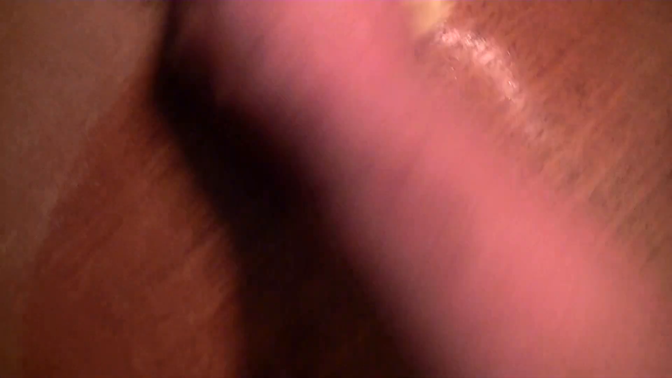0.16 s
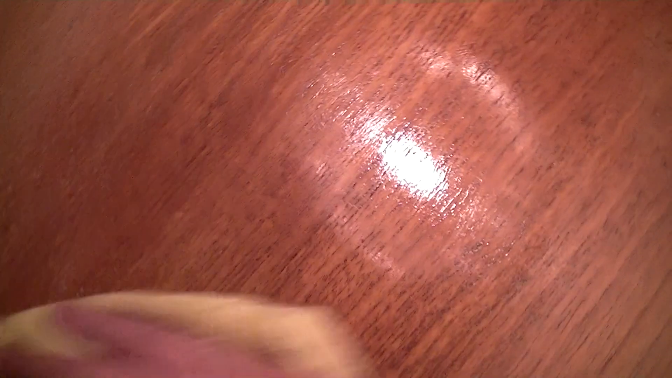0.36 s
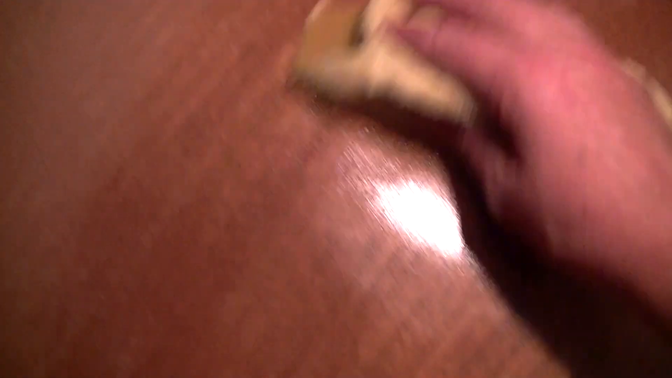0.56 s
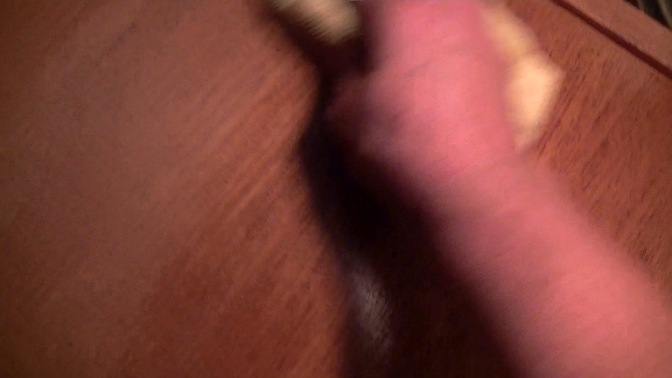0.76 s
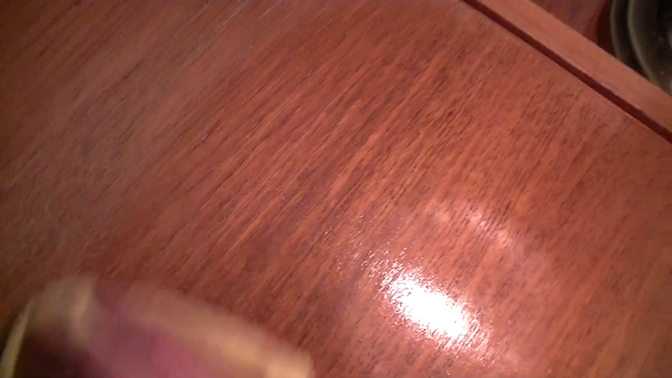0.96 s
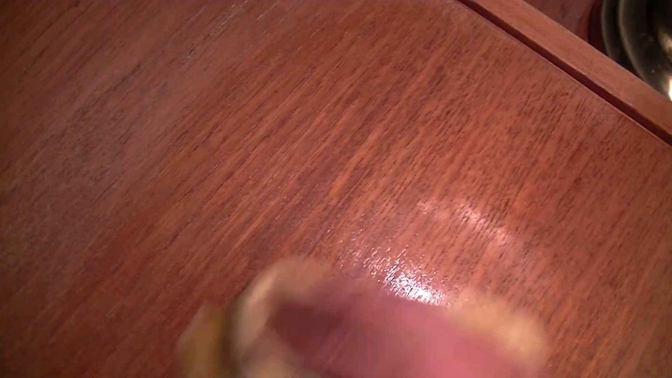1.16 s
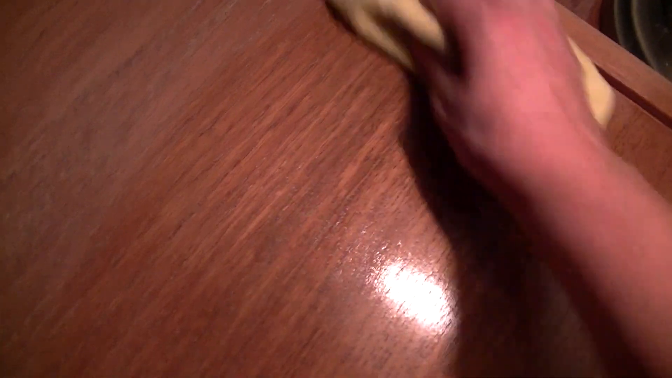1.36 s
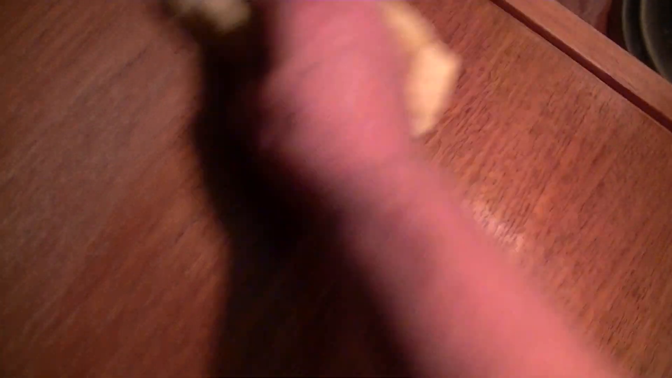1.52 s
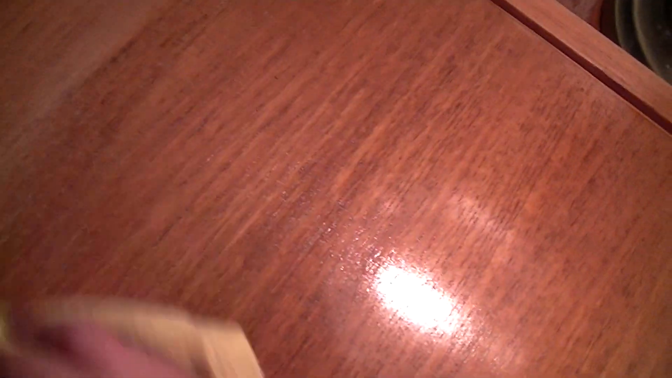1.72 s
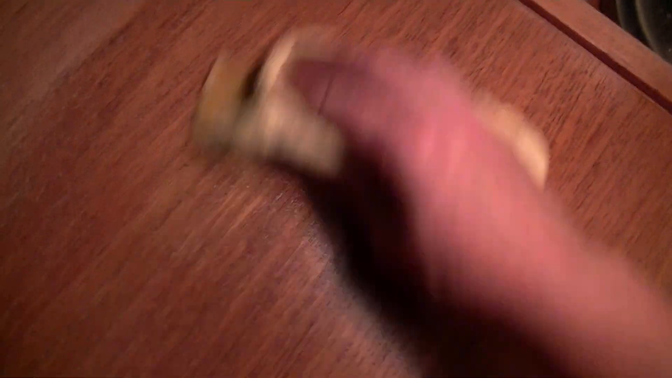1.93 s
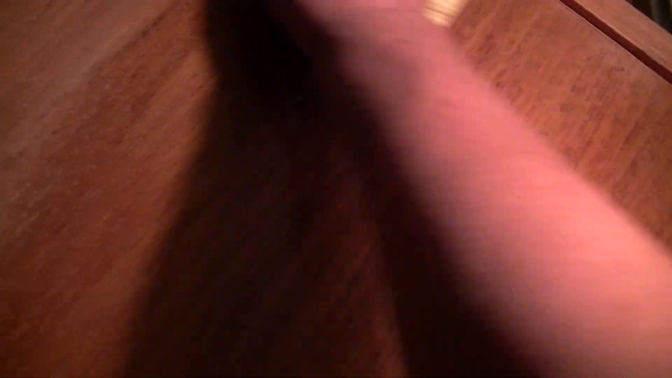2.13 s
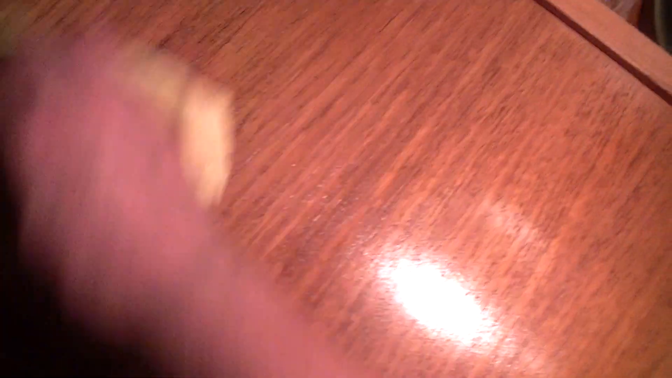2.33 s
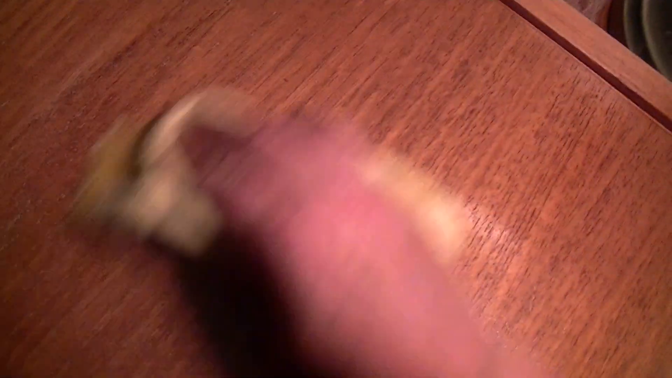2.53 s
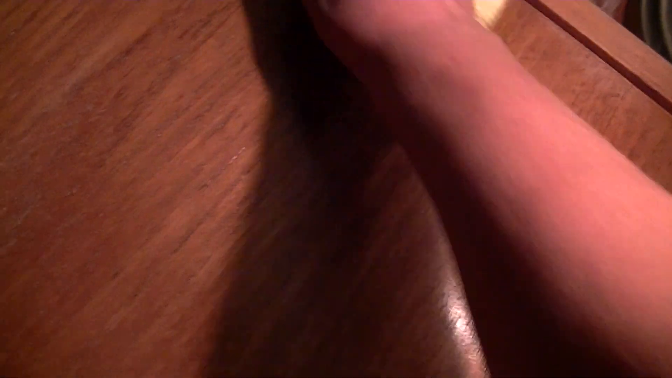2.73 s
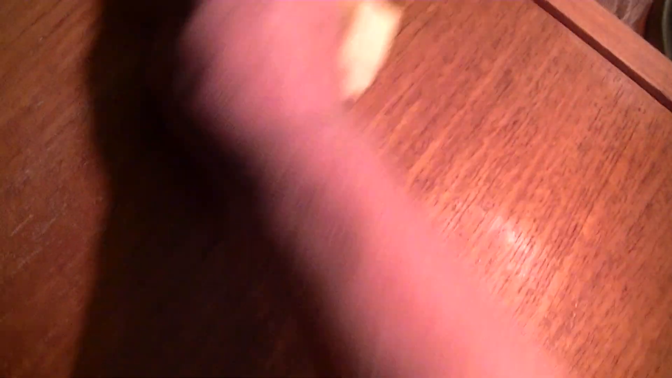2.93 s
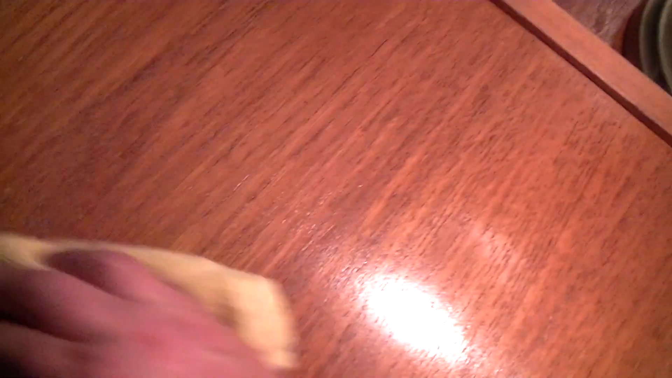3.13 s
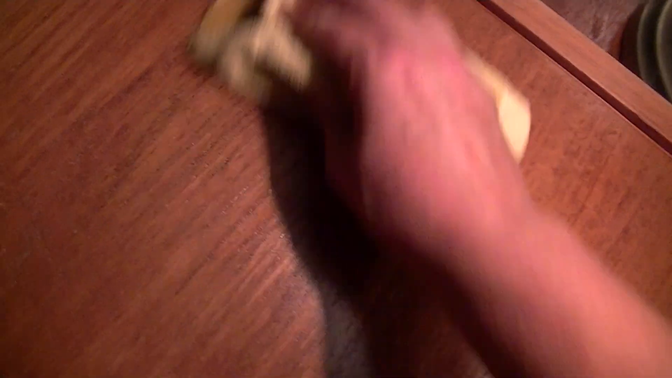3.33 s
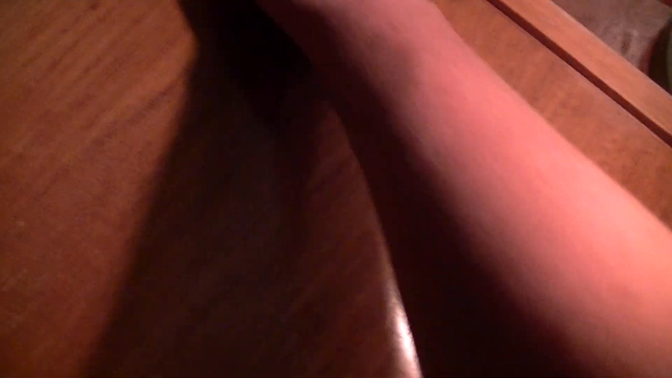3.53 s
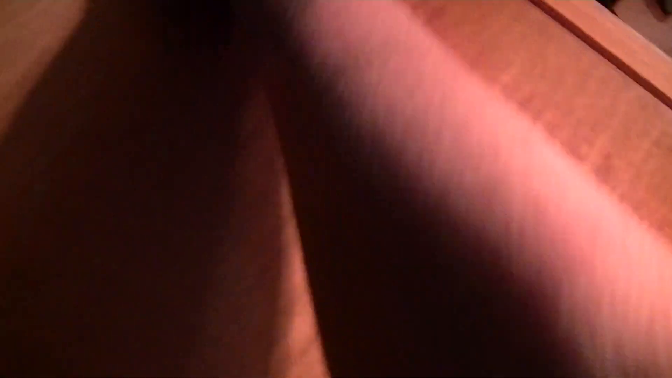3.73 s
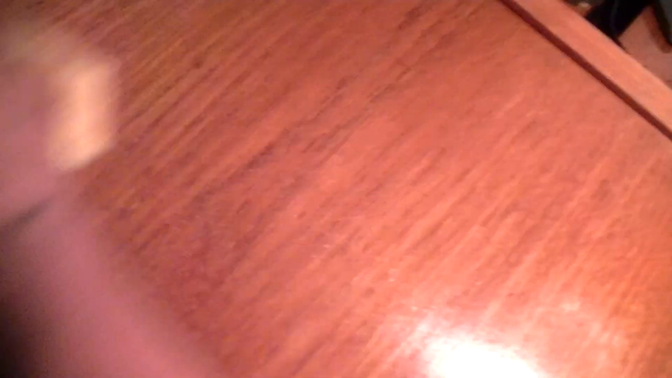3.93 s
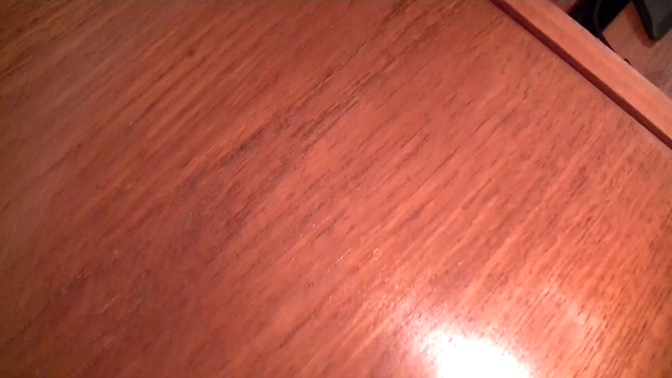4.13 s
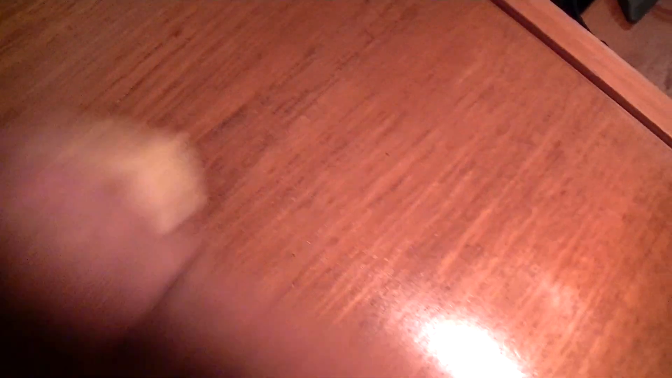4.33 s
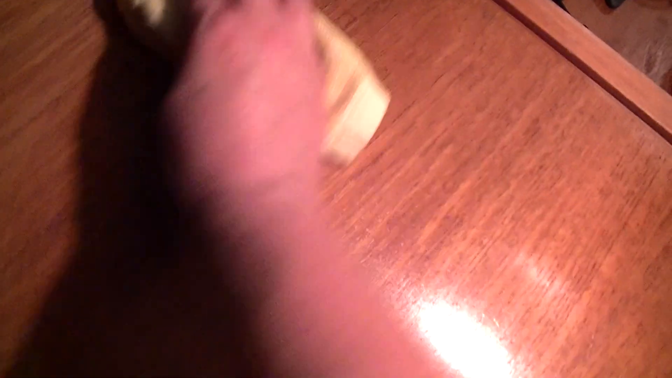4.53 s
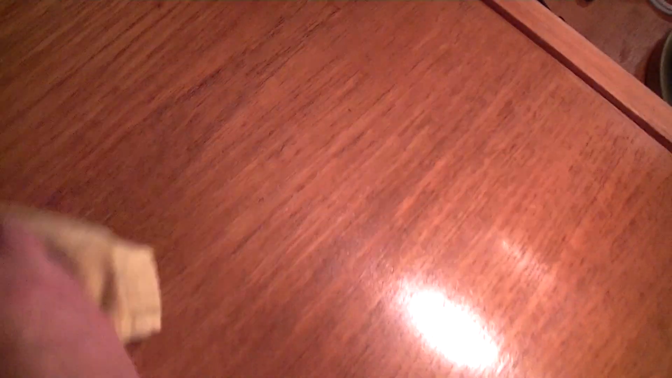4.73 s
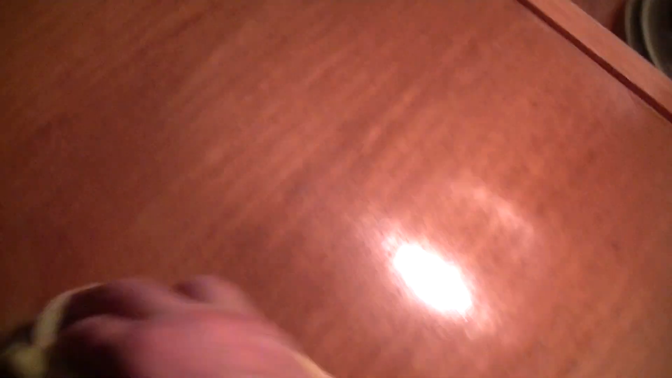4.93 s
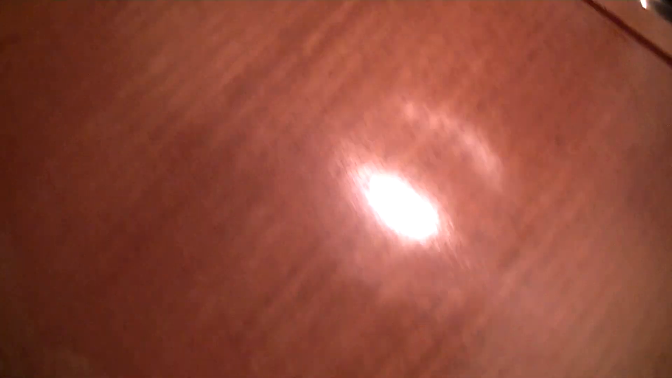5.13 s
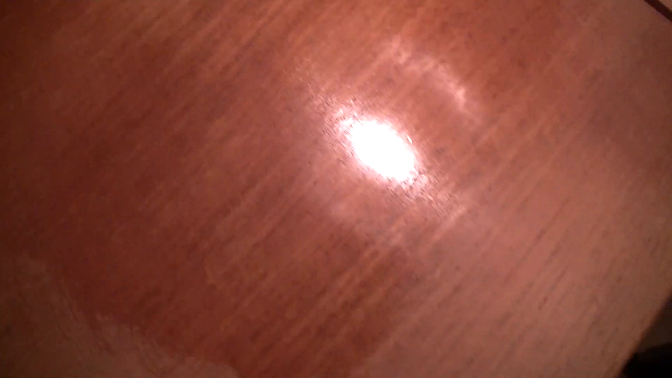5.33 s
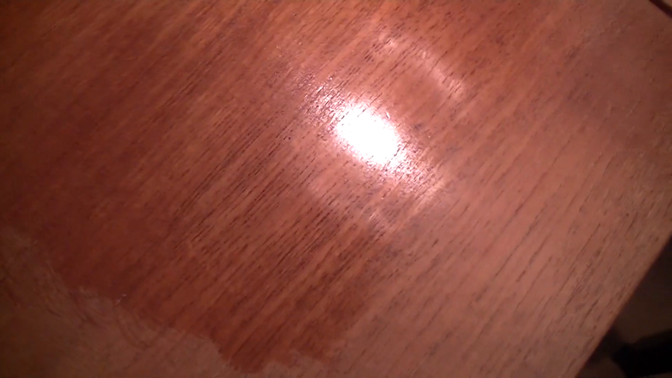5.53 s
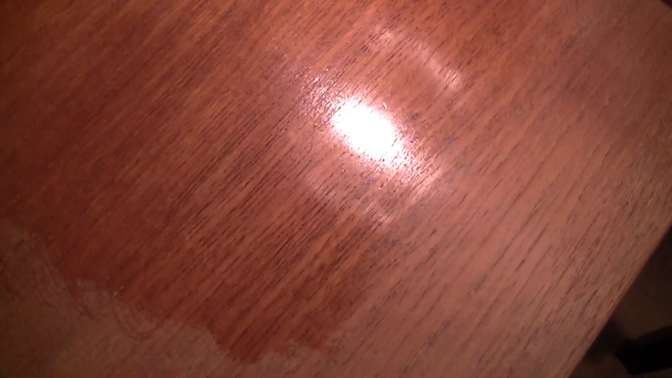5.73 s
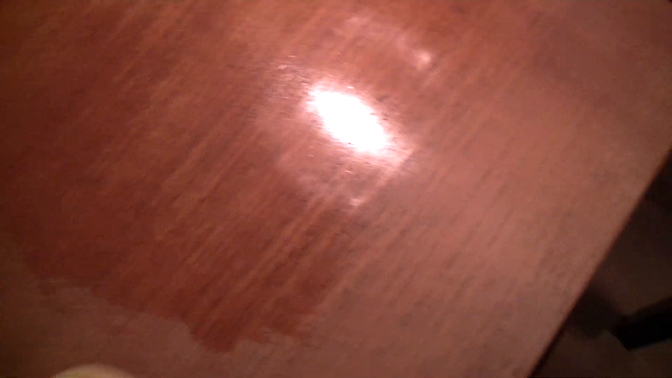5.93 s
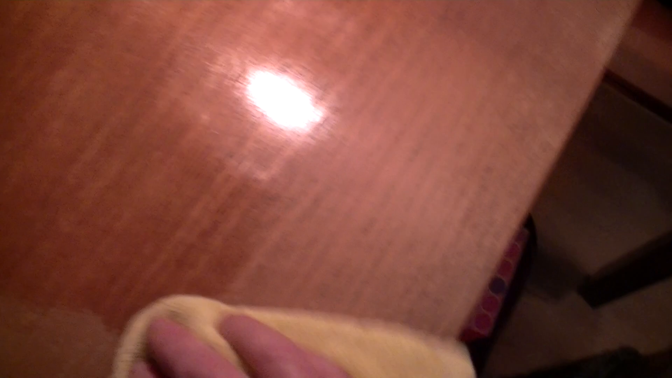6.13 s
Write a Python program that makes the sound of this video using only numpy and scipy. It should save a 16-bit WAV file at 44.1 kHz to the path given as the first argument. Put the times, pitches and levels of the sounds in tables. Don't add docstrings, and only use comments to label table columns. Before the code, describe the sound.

Close stereo rubbing of cloth on wood indoors: continuous swishing strokes, bright fibre hiss over a hollow mid-pitched scrape, shifting slightly left once each circle. Small taps come now and then, with one sharp clattering knock past the middle. After nearly five seconds the hand leaves; low room hush, appliance hum and faint lens ticking remain, then the cloth crackles down and rubs again.

```python
import sys
import numpy as np
from scipy import signal
from scipy.fft import rfft, irfft, next_fast_len
from scipy.io import wavfile

SR = 44100
rng = np.random.default_rng(int(sys.argv[2]) if len(sys.argv) > 2 else 0)


def to_wav(s):
    ch = np.atleast_2d(s).T
    pcm = np.round(np.clip(ch, -1, 1) * 32767)
    wavfile.write(sys.argv[1], SR, pcm.astype(np.int16))


def undo_db(level):
    steps = np.asarray(level, float) / 20
    return 10 ** steps


N = 276286

# pitch_hz, level_db (per Hz)
AIR_COLOUR = [(20, -21), (110, -26), (190, -18), (260, -9.5), (400, -1), (550, 3), (900, 2.5), (1050, 2.5),
              (1500, -1), (2500, -5), (3600, -8.5), (4950, -8), (5200, -15), (15600, -33)]
# pitch_hz, likeness (0-1)
AIR_LIKENESS = [(100, 0.18), (150, 0.69), (500, 0.86), (2000, 0.67), (5000, 0.74), (12000, 0.85)]
# pitch_hz, level_db (rms), waver_hz
HUM_TONES = [(123, -102, 2), (300, -87, 2), (533, -74.5, 3), (790, -80, 12), (1030, -79, 20),
             (3274, -76.5, .4)]
# time_s, rise_db, half_width_s
LOW_SURGES = [(0.0, 8.4, 0.35), (1.75, 15, 0.49), (2.4, 8.3, 0.32), (3.0, 5.4, 0.48), (3.9, 4.8, 1),
              (4.6, 6.8, 0.36), (6.26, 4.1, 0.1)]
# time_s, rise_db, half_width_s
HIGH_SURGES = [(.25, 5.2, 0.37), (1.55, 7.7, .3), (2.43, 11, 0.27), (3.7, 11, 0.53), (5.35, 10.4, 0.32),
               (6.26, 6, 0.36)]
# start_s, peak_db
LENS_STEPS = [(5.2031, -61), (5.2355, -59), (5.2694, -64), (5.3023, -58), (5.3353, -61), (5.4365, -58),
              (5.469, -58), (5.5024, -61), (5.5358, -61), (5.5697, -59), (5.6032, -60), (5.6361, -60),
              (5.67, -62), (5.7019, -58), (5.7359, -62), (5.8905, -63), (5.9464, -62), (5.9798, -59),
              (6.0122, -58)]
# start_s, peak_db, centre_hz, length_s
LANDING_CRACKLES = [(5.792, -62, 9500, .003), (6.114, -58, 12500, .012), (6.165, -48, 8000, .006),
                    (6.182, -46, 5500, .0015), (6.188, -41, 4830, 0.0014)]
# start_s, peak_db, pitch_hz,
# ring_s
WOOD_TICKS = [(3.517, -37, 880, .025), (3.522, -41, 415, .035), (3.5235, -35, 1130, .035),
              (3.521, -39.5, 650, .04), (3.536, -39, 600, .045), (3.546, -52, 270, .045),
              (3.553, -39, 1950, .03), (3.555, -38.5, 2600, .02), (3.564, -47, 900, .015),
              (3.609, -39, 1720, .035), (3.610, -41, 1960, .03), (4.139, -35.5, 2050, .025),
              (4.144, -40, 1550, .014), (4.146, -41, 2400, .012), (4.16, -41, 1950, .02),
              (4.151, -37, 3100, .005), (4.172, -41, 2600, .015), (4.952, -52, 2300, .06),
              (5.677, -64, 4250, .05), (5.812, -59, 2850, .04), (5.527, -66, 11500, .002),
              (5.791, -60, 8300, .002), (6.035, -62, 9000, .002)]
# start_s, peak_db, pitch_hz, ring_s
SOFT_BUMPS = [(0.178, -50.5, 405, 0.033), (1.314, -62, 260, 0.11), (1.485, -69.5, 131, 0.19),
              (1.511, -51.5, 381, 0.17), (2.143, -36, 2050, 0.02), (2.149, -39, 1780, .02),
              (2.361, -61, 257, 0.14), (2.37, -79, 122, 0.24), (2.411, -55, 264, 0.16),
              (2.392, -38, 1420, 0.046), (2.741, -35.5, 1420, 0.029), (2.743, -38, 3140, 0.017),
              (2.747, -40, 754, 0.023), (2.765, -46, 780, 0.025), (2.745, -40, 2450, .015),
              (2.747, -33, 4120, .01), (3.52, -50, 2060, .04), (3.95, -54, 290, 0.12),
              (4.951, -46, 1360, 0.064), (5.89, -50, 600, 0.088), (3.95, -40.5, 778, 0.068),
              (4.05, -44, 750, 0.055), (6.027, -51, 1057, .04), (6.034, -53.5, 420, 0.04)]
# start_s, peak_db, dullness_db (per octave)
KNOCK_BOUNCES = [
    (3.518, -43, -7),
    (3.5229, -43, -4),
    (3.5275, -32.5, 2),
    (3.537, -41, 6.5),
    (3.543, -33, -2),
    (3.55, -42, 2),
    (3.565, -41, 5),
]
# pitch_hz, level_db, ring_s (time to fall 60 dB)
TABLETOP_MODES = [(168, -26, 0.08), (260, -1, 0.033), (353, -7, 0.04), (450, -2, 0.017), (520, 6, 0.029),
                  (648, 10, 0.039), (910, 1, 0.03), (1010, -4, 0.021), (1350, 6, 0.033), (1850, -6, .04),
                  (2010, 0, 0.05), (2600, -6, 0.023)]
# time_s, pressure_db, speed_db
HAND = [(0.0, 0.5, -2), (0.75, -1.5, 0.5), (1.5, 1, 1.5), (3.0, -0.5, 1), (3.9, 4.5, -1), (4.81, -0.5, 2),
        (4.86, -10, -2), (4.9, -2.5, -14.5), (5.0, -6, -14), (5.06, -14.5, -12.5), (5.18, -27, -14),
        (5.72, -29.5, -13), (5.9, -14, -19.5), (5.97, -17, -20), (6.05, -2.5, -23.5), (6.15, -19, -12),
        (6.185, -14.5, -3.5), (6.265, -8, -5)]
# time_s, extra_pressure_db
PRESSES = [(.09, 1), (.2, 2), (.28, 4.5), (.585, -0.5), (.975, 2.5), (1.33, 0.5), (1.69, 4.5), (1.945, 0.5),
           (2.1, 2), (2.17, 2.5), (2.39, 5), (2.63, 1.5), (2.751, 2.5), (2.865, 2), (3.02, 4.5), (3.085, 5),
           (3.35, 1.5), (3.47, 1.5), (3.55, 0.5), (4.05, 2.5), (4.15, 1.5), (4.315, -0.5), (4.61, 4.5),
           (4.69, 1), (4.96, 2)]
# time_s, extra_speed_db, half_width_s
SWEEPS = [(.1, 2, 0.044), (.63, 0, 0.082), (1.33, -1.5, 0.1), (1.52, 0.5, .05), (1.99, 1.5, 0.045),
          (2.2, 5, 0.051), (2.645, 3, 0.079), (2.899, 4, 0.058), (3.38, 2.5, 0.06), (4.09, 2, 0.19),
          (4.31, 3, .04), (4.43, 5, .05)]
# time_s, sag_db, half_width_s
TURNS = [(.04, 0.5, 0.022), (.39, 4.5, 0.044), (.505, 1, .04), (.87, 2, 0.031), (1.1, 5, 0.068),
         (1.61, 1.5, 0.036), (1.81, 3, 0.06), (2.08, 2, .03), (2.28, 1, 0.029), (2.46, 2.5, 0.032),
         (2.81, 0.5, .035), (2.96, 0.5, .03), (3.16, 0.5, 0.031), (3.68, 1, 0.046), (4.235, 5.5, 0.053),
         (4.54, 2, 0.12), (4.72, 1, 0.026)]
# time_s, how_far (0-1), half_width_s
ASIDE = [(.33, 0.8, 0.09), (1.0, 0.75, 0.19), (1.74, 1, 0.1), (2.42, 0.9, 0.14), (3.12, 0.6, 0.19),
         (4.05, 1.1, 0.14), (4.28, 0.8, 0.19), (4.78, 0.8, 0.16), (6.22, 0.6, .1)]
ZONE_EDGES = [450, 1400, 4000, 10000, 15000]
ZONE_LEVELS = [-54, -48.5, -49.5, -64]
FOLLOWS_PRESSURE = [0.97, 0.63, 0.44, 0.22]
FOLLOWS_SPEED = [0.05, 0.3, 0.6, 1.15]
FOLLOWS_ASIDE = [-0.52, 0.88, 0.66, 0.025]
# time_s, lift_db, half_width_s, pitch_hz
HAND_POCKETS = [(2.27, -9, 0.045, 1900), (.2, 9, 0.028, 704), (.27, 3.5, 0.059, 2700),
                (.48, 5.5, 0.094, 930), (.57, 4, 0.089, 2200), (.62, 4.5, .1, 13000), (.7, 1, 0.14, 4580),
                (.72, 9.5, 0.077, 560), (.75, -4, 0.17, 9300), (.85, -1, 0.043, 2400),
                (1.0, 0.5, 0.053, 1670), (1.02, 2.5, .09, 4000), (1.17, -10, 0.088, 600),
                (1.19, -3, .07, 1100), (1.33, 4, .08, 12800), (1.36, 8.5, 0.088, 520),
                (1.62, 2.5, .06, 1240), (1.75, -3, 0.094, 12000), (2.26, 2, 0.043, 800),
                (1.95, -1, 0.065, 840), (1.97, 1.5, 0.035, 2380), (2.16, 2, 0.11, 1050),
                (2.2, -8, 0.057, 10500), (2.2, -1.5, .08, 3330), (2.4, -1.5, .05, 12800),
                (2.45, 3, 0.045, 560), (2.45, 3, .05, 1670), (2.55, 3, 0.046, 9400), (2.77, 10, 0.037, 563),
                (2.86, 1, 0.035, 5970), (2.9, -6, 0.055, 11400), (4.93, 15, 0.09, 382),
                (3.07, -5, 0.034, 865), (3.1, 2, .05, 3350), (3.5, 2.5, .14, 13500), (3.6, 2.5, .05, 1660),
                (3.78, -5.5, 0.097, 1090), (.06, 2, 0.12, 2100), (3.72, 4.5, 0.052, 2080),
                (1.69, 1.5, 0.07, 5500), (4.05, -1.5, .05, 6960), (4.05, 0, 0.055, 560),
                (4.25, -1.5, .06, 1180), (4.31, 2.5, 0.081, 2900), (4.42, -5, .05, 12800),
                (4.42, -4, 0.055, 6400), (4.7, 1.5, 0.059, 1490), (4.69, 4.5, 0.09, 3140),
                (4.96, -4.5, 0.087, 5100), (5.1, -3, .05, 4500)]
# pitch_hz, level_db (per Hz)
RUB_COLOUR = [(120, -61), (200, -40), (300, -25.5), (560, -10.5), (750, -2), (1300, 0), (1700, -3.5),
              (2000, -2), (4000, -6.5), (6000, -8.5), (8500, -13.5), (11300, -21.5), (12300, -25),
              (15800, -39.5)]
# pitch_hz, likeness (0-1)
RUB_LIKENESS = [(100, 0.32), (150, 0.47), (500, 1), (2000, 0.91), (5000, 0.91), (8000, 0.91), (12000, 0.95)]


def rms_one(x):
    return x / np.sqrt(np.mean(x ** 2) + 1e-20)


def in_time(rows):
    s, *columns = np.transpose(rows)
    return np.array([np.interp(np.arange(N) / SR, s, column) for column in columns])


def at_hz(points, hz):
    points_hz, values = np.transpose(points)
    return np.interp(np.log(hz), np.log(points_hz), values)


def drift(rate_hz):
    r = np.exp(-80 * np.pi * rate_hz / SR)
    noise = rng.standard_normal(N // 40 + 2002)
    slow = signal.lfilter([1], [1, -2 * r, r * r], noise)[2000:]
    return np.interp(np.arange(N) / 40, np.arange(len(slow)), rms_one(slow - slow.mean()))


def swell(s, db, half_s):
    coarse_s = np.arange(0, N + 64, 64) / SR
    bells = np.array(db) * np.exp(-((coarse_s[:, None] - np.array(s)) / half_s) ** 2)
    return np.interp(np.arange(N) / SR, coarse_s, bells.sum(axis=1))


def band_pass(x, low_hz, high_hz, order=2):
    sos = signal.butter(order, [low_hz, high_hz], "band", fs=SR, output="sos")
    return signal.sosfilt(sos, x)


def high_pass(x, hz, order):
    return signal.sosfilt(signal.butter(order, hz, "high", fs=SR, output="sos"), x)


def ring(clicks, hz, t60):
    r, w = undo_db(-60 / (t60 * SR)), 2 * np.pi * hz / SR
    return signal.lfilter([0, np.sin(w)], [1, -2 * r * np.cos(w), r * r], clicks + 1e-18)


def resonance(x, hz, width_hz):
    r, w = np.exp(-np.pi * width_hz / SR), 2 * np.pi * hz / SR
    peak = np.array([1, 0, -1]) * (1 - r * r) / 2
    return signal.lfilter(peak, [1, -2 * r * np.cos(w), r * r], x)


def colour(mid_side, spectrum, likeness):
    size = next_fast_len(N + SR // 4)
    hz = np.maximum(np.arange(size // 2 + 1) * SR / size, 1)
    alike = np.clip(at_hz(likeness, hz), 0, .985)
    shares = np.sqrt([1 + alike, 1 - alike])
    coloured = rfft(mid_side, size) * shares * undo_db(at_hz(spectrum, hz))
    mid, side = irfft(coloured, size)[:, :N]
    return np.array([mid + side, mid - side]) * np.sqrt(SR / 4)


def room_air():
    noise = rng.standard_normal((2, N)) * undo_db(.5 * drift(5))
    return undo_db(-58.5) * rms_one(colour(noise, AIR_COLOUR, AIR_LIKENESS))


def tone(hz, waver_hz):
    return np.sqrt(2) * np.sin(2 * np.pi * np.cumsum(hz + waver_hz * drift(8)) / SR)


def motor(hz, waver_hz, idle_db, surges):
    return undo_db(idle_db + swell(*np.transpose(surges))) * tone(hz, waver_hz)


def hum():
    steady = sum(undo_db(db + drift(3)) * tone(hz, waver_hz) for hz, db, waver_hz in HUM_TONES)
    low = motor(239, waver_hz=1.3, idle_db=-93, surges=LOW_SURGES)
    high = motor(266, waver_hz=2.13, idle_db=-89, surges=HIGH_SURGES)
    return steady + low + high


def lens_drive():
    s, db = np.transpose(LENS_STEPS)
    clicks = np.zeros(N)
    clicks[np.round((s - .002) * SR).astype(int)] = undo_db(db - 1.5)
    twice = ring(ring(clicks, 3860, .02), 3890, .02)
    return twice * clicks.max() / abs(twice).max()


def touch():
    out, t = 0, np.arange(N) / SR
    for s, db, hz, length_s in LANDING_CRACKLES:
        fading = (t > s) * np.exp(-np.abs(t - s) / length_s)
        crackle = band_pass(fading * rng.standard_normal(N), hz / 1.3, min(hz * 1.23, 19000))
        out = out + undo_db(db - 2.5) * crackle * np.sqrt(SR / hz / 2)
    return out


def ticks():
    out = 0
    for s, db, hz, t60 in WOOD_TICKS:
        click = (np.arange(N) == round(s * SR)) * 1.
        tick = ring(ring(click, hz, t60), 1.06 * hz, t60)
        out = out + undo_db(db) * tick / abs(tick).max()
    return high_pass(out, 200, order=4)


def burst(s, length_s, scuff_s):
    out, at, size = np.zeros(N), round(s * SR), round(length_s * SR)
    out[at:at + size] = np.hanning(size) / np.hanning(size).sum()
    tail_s = np.arange(SR // 5) / SR
    scuff = rng.standard_normal(len(tail_s)) * np.exp(-tail_s / scuff_s) / np.sqrt(scuff_s * SR)
    out[at:at + len(tail_s)] += 0.66 * scuff
    return out


def bumps():
    out = 0
    for s, db, hz, t60 in SOFT_BUMPS:
        contact = burst(s, 0.5 / hz, 0.5 * t60)
        pair = ring(contact, hz, t60) + 0.5 * ring(contact, 1.2 * hz, 2.0 * t60)
        blow = band_pass(pair, hz / 1.3, hz * 1.18)
        out = out + undo_db(db - 2.0) * blow / abs(blow).max()
    return out


def palm_thud(start_s):
    rise_s, t = 0.011, np.arange(N) / SR - start_s
    shape = (t > 0) * t / rise_s * np.exp(-abs(t) / rise_s)
    return undo_db(-28.5) * shape * resonance(rng.standard_normal(N), 900, width_hz=1200)


def knock():
    s, db, dull_db = np.transpose(KNOCK_BOUNCES)
    out = 0
    for k, (hz, level_db, t60) in enumerate(TABLETOP_MODES):
        uneven_db = rng.normal(0, 5.7, len(s))
        clicks = np.zeros(N)
        strike_db = db + level_db - 17.0 - dull_db * np.log2(hz / 650) + uneven_db
        clicks[np.round(s * SR).astype(int)] = undo_db(strike_db)
        out = out + (-1) ** k * ring(clicks, hz, t60)
    return band_pass(out + palm_thud(s[0]), 230, 3500, order=4)


def stroke():
    pressure_db, speed_db = in_time(HAND)
    sag_db = swell(*np.transpose(TURNS))
    pressure_db = pressure_db + swell(*np.transpose(PRESSES), half_s=0.036) - 0.25 * sag_db
    speed_db = speed_db + swell(*np.transpose(SWEEPS)) - sag_db
    by_hand = np.outer(FOLLOWS_PRESSURE, pressure_db) + np.outer(FOLLOWS_SPEED, speed_db)
    by_place = np.outer(FOLLOWS_ASIDE, swell(*np.transpose(ASIDE)))
    return np.c_[ZONE_LEVELS] + by_hand + by_place


def snaps():
    sizes = undo_db(1.5 * np.minimum(rng.exponential(1, N), 4)) * rng.choice([-1, 1], N)
    happens = rng.random(N) < 400 / SR
    lean_db = 3.5 * rng.standard_normal(N) * np.c_[[1, -1]] / 2
    clicks = sizes * happens * undo_db(lean_db) + 1e-18
    bright = band_pass(clicks, 5600, 11500)
    return undo_db(-10.5 + stroke()[2:].mean(axis=0)) * rms_one(bright)


def pocket_db(hz):
    s, db, half_s, pitch_hz = np.transpose(HAND_POCKETS)
    octaves_away = np.log2(hz / pitch_hz)
    return swell(s, db * np.exp(-(octaves_away / 0.35) ** 2), half_s)


def bands(source, gain_db, mode_db):
    out, edges = 0, 130 * 2 ** np.arange(0, 7.3, .4)
    for k, (low, high) in enumerate(zip(edges, edges[1:])):
        band = band_pass(source[k % 2], low, high)
        modes = 0
        for hz in rng.uniform(low, high, 3) if low < 4500 else []:
            swing = 1.3 * np.tanh(drift(3)) - .3
            modes = modes + undo_db(mode_db) * swing * resonance(band[0], hz, .025 * hz)
        band[0] += modes
        out = out + undo_db(gain_db(np.sqrt(low * high))) * band
    return out


def placed(mid_side):
    mid, side = mid_side
    aside = swell(*np.transpose(ASIDE))
    highs = high_pass(mid, 1200, order=1)
    lean = highs * 0.48 * (aside + 0.18) - .3 * (mid - highs)
    return np.array([mid, side * undo_db(-6 - aside) + lean])


def rub():
    grip_db = -0.37 * (drift(8.4) + 0.22 * drift(44))
    force = undo_db(0.5 * np.minimum(rng.exponential(1, N), 6) + grip_db)
    slips = rms_one(force * rng.standard_normal((2, 2, N)))
    centres, change_db = [], []
    for zone_db, low, high in zip(stroke(), ZONE_EDGES, ZONE_EDGES[1:]):
        grid_hz = np.arange(low, high)
        power = undo_db(2 * at_hz(RUB_COLOUR, grid_hz))
        centres.append(np.log(np.sum(grid_hz * power) / np.sum(power)))
        change_db.append(zone_db - 10 * np.log10(np.sum(power)))

    def gain_db(hz):
        place = np.interp(np.log(hz), centres, range(4))
        weights = np.clip(1 - abs(place - np.arange(4)), 0, 1)
        return weights @ change_db + pocket_db(hz) + 0.5 * drift(25.0) - .8

    return colour(placed(bands(slips, gain_db, mode_db=-7)), RUB_COLOUR, RUB_LIKENESS)


def scene():
    right = np.c_[[1, -1]] / 2
    room = undo_db(-0.6 * right) * (room_air() + hum() + lens_drive())
    hand = touch() + ticks() + bumps() + undo_db(-2 * right) * knock()
    return room + hand + snaps() + rub()


def band_limit(x):
    return signal.sosfilt(signal.butter(12, 15690, fs=SR, output="sos"), x)


def record(dry):
    return band_limit(dry)


dry = scene()
out = record(dry)
to_wav(out)
```